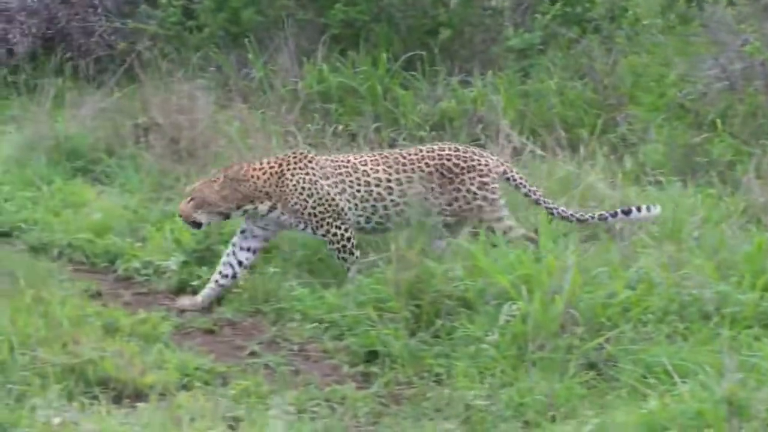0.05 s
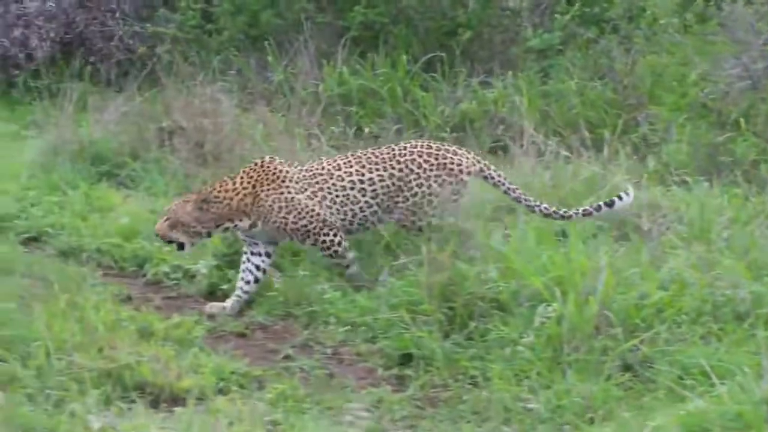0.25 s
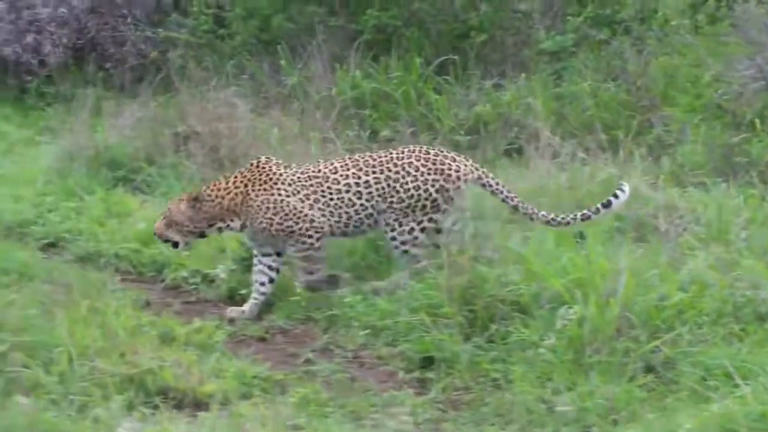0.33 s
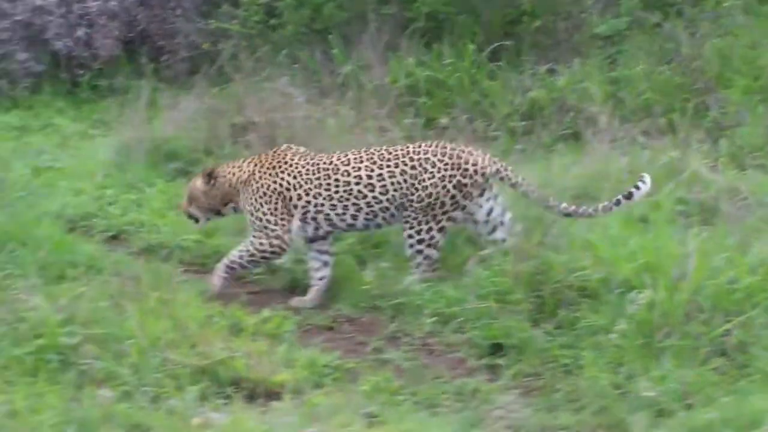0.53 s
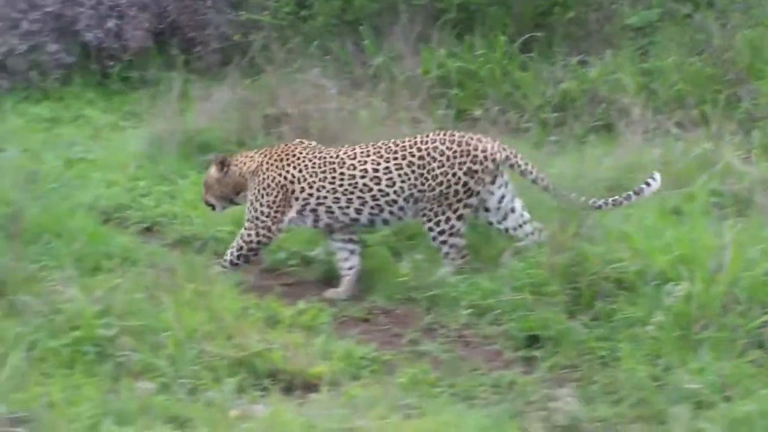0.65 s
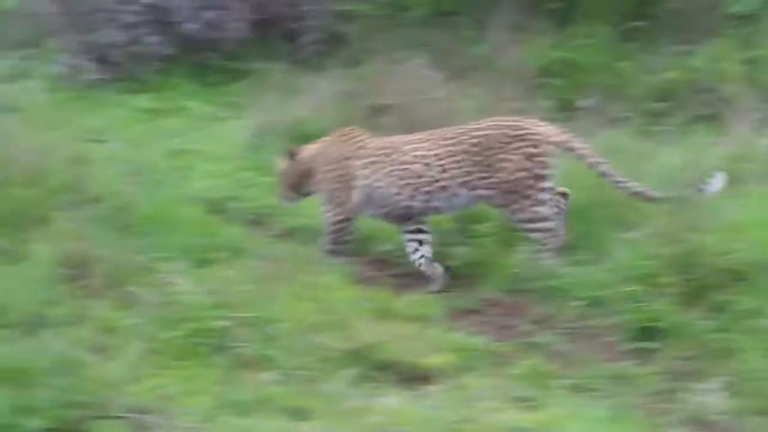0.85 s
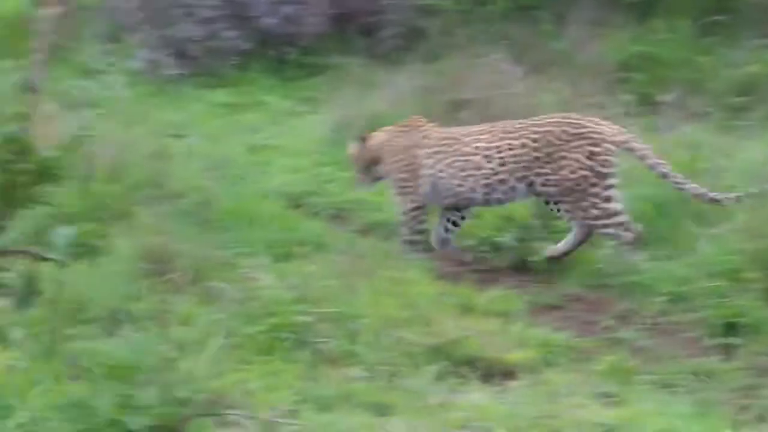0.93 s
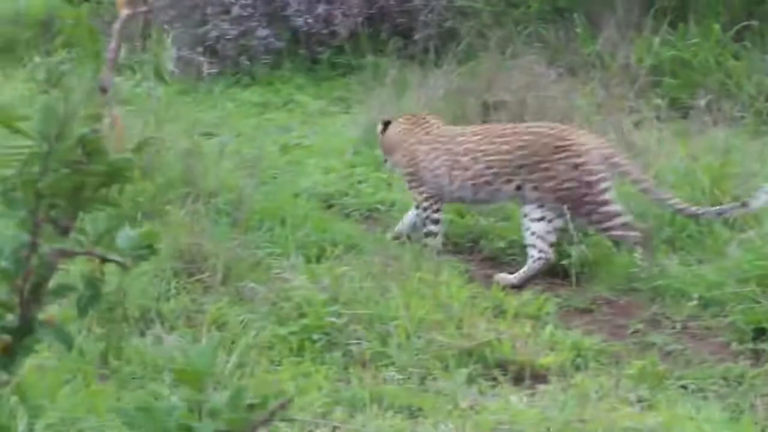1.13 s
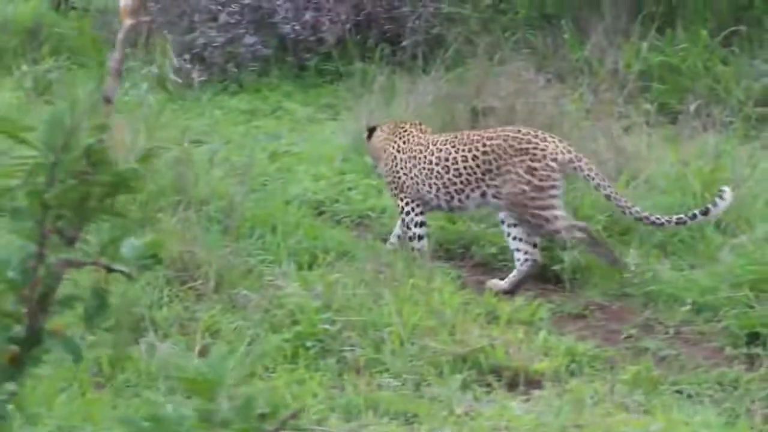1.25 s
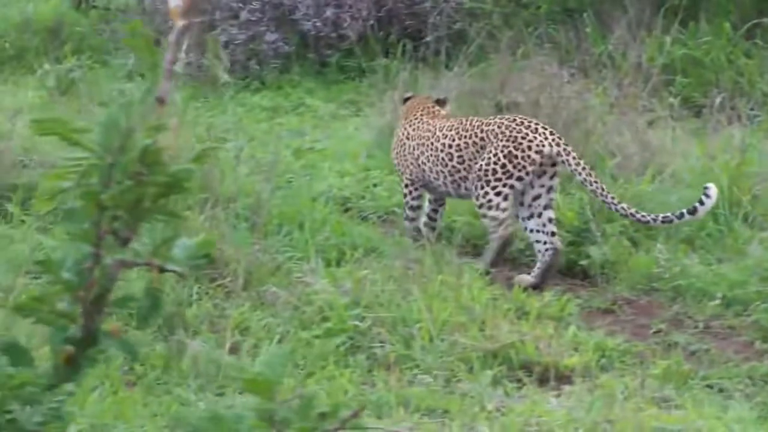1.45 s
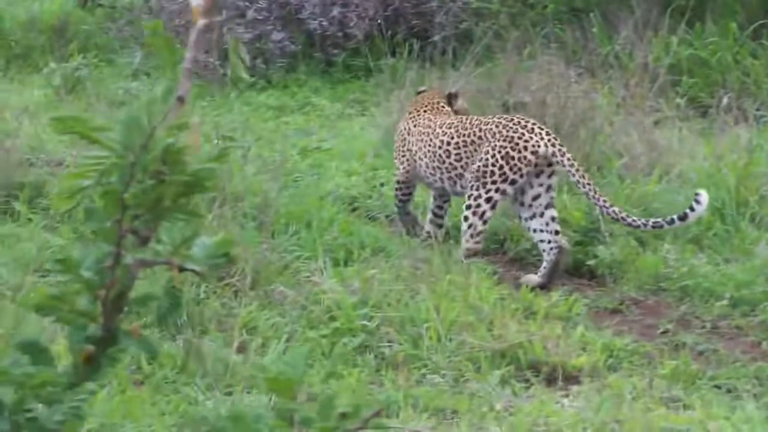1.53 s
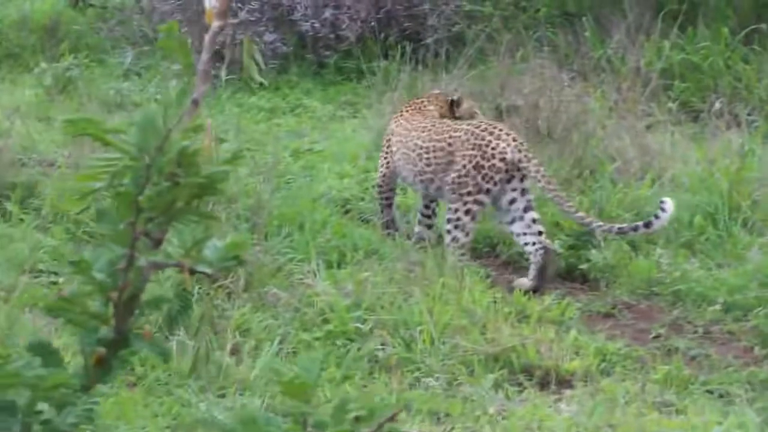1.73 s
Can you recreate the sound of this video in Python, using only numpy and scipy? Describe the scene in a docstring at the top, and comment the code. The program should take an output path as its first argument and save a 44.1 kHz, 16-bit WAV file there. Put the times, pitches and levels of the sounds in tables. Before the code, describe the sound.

A leopard's sawing call, close and centred: a rattling in-breath until about 0.1 s, a deep hoarse pulsing stroke from 0.2 to 0.55, a quieter uneven rattle around 0.65-0.9, then a second rasping stroke from 0.97 to 1.35. Dry stalks snap and crackle at 1.05-1.16. A fainter in-breath rattles from 1.4 to 1.8. Steady high insect hiss, soft leaf noise and low outdoor murmur continue throughout, with slight bush scatter.

```python
"""A rattling in-breath over an insect hiss comes first; then a leopard saws out two hoarse outward strokes.
Quieter in-breaths rattle between and after them, and dry stalks snap during the second stroke.
The slack vocal folds flap mostly 40-60 times a second; each flap rings the throat, mouth and lips
and lets out a puff of rasping air. Insects are noise in many narrow bands plus thin steady notes,
over a soft bed of leaf noise and low outdoor murmur."""
import sys
import numpy as np
from scipy import signal
from scipy.fft import rfft, irfft, next_fast_len
from scipy.io import wavfile
from scipy.ndimage import uniform_filter1d

SR = 44100
rng = np.random.default_rng(int(sys.argv[2]) if len(sys.argv) > 2 else 0)


def generate_wav(sig):
    """Save sig (samples, or channels by samples) to the path in sys.argv[1] as 16-bit PCM at SR."""
    pcm = np.round(np.clip(np.atleast_2d(sig).T, -1, 1) * 32767).astype(np.int16)
    wavfile.write(sys.argv[1], SR, pcm)


N = 79380  # 1.8 s


def amp(db):
    """Decibels to gain."""
    return 10 ** (np.asarray(db) / 20)


def unit(x):
    """Scale to rms 1."""
    return x / np.sqrt(np.mean(x ** 2) + 1e-20)


def at(rows, s):
    """Every column of a curve, interpolated at the times s."""
    knots, *columns = np.transpose(rows)
    return np.array([np.interp(s, knots, column) for column in columns])


def noise(spectrum, size=N):
    """Noise of rms 1 with the given (Hz, dB) colour."""
    hz, db = np.transpose(spectrum)
    bins = np.fft.rfftfreq(size, 1 / SR)
    gain = amp(np.interp(np.log(bins + 1), np.log(hz), db))
    return unit(irfft(rfft(rng.standard_normal(size)) * gain, size))


def fade(t60, attack):
    """A rounded rise and an exponential decay, 0.2 s long; t60 and attack in seconds."""
    t = np.arange(SR // 5) / SR
    return np.exp(-np.log(1000) * t / t60) * (1 - np.exp(-(t / attack) ** 2))


def ring(hz, db, t60, attack):
    """One resonance struck by a flap: a sine that builds up and dies away."""
    shape = fade(t60, attack)
    return amp(db) * shape * np.sin(2 * np.pi * hz * np.arange(len(shape)) / SR)


def burst(spectrum, db, t60, attack):
    """A dying puff of coloured noise."""
    shape = fade(t60, attack)
    return amp(db) * shape * noise(spectrum, size=len(shape))


def add(track, s, sound):
    """Mix a sound in at time s, cut off at the end of the track."""
    i = int(np.clip(round(s * SR), 0, N))
    track[i:i + len(sound)] += sound[:N - i]


def spread(make, alike):
    """A stereo pair from two draws of a sound, with the given likeness (1 = mono)."""
    turn = np.arccos(np.clip(alike, -1, 1)) / 2
    mid = np.cos(turn) * make()
    side = np.sin(turn) * make()
    return np.array([mid + side, mid - side])


def low_cut(x, hz, order):
    """A small mouth radiates little bass."""
    return signal.sosfilt(signal.butter(order, hz, 'high', fs=SR, output='sos'), x)


AIR_DB, AIR_ALIKE = -49, .99
LEAVES_DB, LEAVES_ALIKE = -49.5, 0.2
# Colour of the low outdoor murmur. Each row: frequency in Hz, density in dB per Hz.
AIR_COLOUR = [(25, -17.5), (60, -17.5), (110, -0.5), (190, 6.5), (350, 0), (600, -4), (1000, -18.5),
              (2000, -23.5), (4000, -66)]
# Colour of the leaves. Each row: frequency in Hz, density in dB per Hz.
LEAF_COLOUR = [(60, -50.5), (200, -0.5), (600, 0.5), (1000, -2), (2000, -5.5), (2550, -14), (3100, -26),
               (4500, -23.5), (7000, -58)]


def outdoors():
    """Steady coloured noise: a nearly mono low murmur and a wide bed of leaves."""
    air = amp(AIR_DB) * spread(lambda: noise(AIR_COLOUR), AIR_ALIKE)
    leaves = amp(LEAVES_DB) * spread(lambda: noise(LEAF_COLOUR), LEAVES_ALIKE)
    return air + leaves


INSECT_GRAIN_DB = 3.2  # rms unevenness between the narrow bands
INSECT_ALIKE, INSECT_PAN_DB = 0.51, 1  # pan: left up and right down by this much
# Colour of the hiss. Each row: frequency in Hz, density in dB per Hz.
INSECT_COLOUR = [(3060, -53.5), (5200, -31), (6280, -17.5), (6530, -10), (7040, -8), (7370, -2.5),
                 (7830, -1), (8920, -12), (9220, -15.5), (9980, -20), (10700, -29), (13900, -65.5),
                 (22000, -120)]
# Level of the hiss, dipping during the first stroke.
# Each row: time in seconds, level in dB before panning.
HISS_LEVEL = [(0, -47.5), (.2, -46), (.3, -50.5), (.5, -50), (.8, -48), (1.2, -47.5), (1.8, -46.5)]
# Thin steady notes in the chorus.
# Each row: frequency in Hz, amplitude in dB before the level curve and panning.
SHRILL_NOTES = [(7350, -62), (7568, -62), (8011, -59)]


def insects():
    """A distant chorus: a high hiss made of many narrow bands, with a few thin notes among it."""
    t = np.arange(N) / SR
    grain = unit(uniform_filter1d(rng.standard_normal(N // 2 + 1), size=20))
    bands = amp(INSECT_GRAIN_DB * grain)

    def hiss():
        return unit(irfft(rfft(noise(INSECT_COLOUR)) * bands, N))

    def note(hz, db):
        phase_drift = np.cumsum(rng.standard_normal(N)) * 0.022  # radians
        return amp(db) * np.sin(2 * np.pi * hz * t + phase_drift)

    chorus = spread(hiss, INSECT_ALIKE)
    notes = spread(lambda: sum(note(hz, db) for hz, db in SHRILL_NOTES), INSECT_ALIKE)
    level_db = at(HISS_LEVEL, t)[0]
    levelled = amp(level_db) * chorus + amp(level_db - level_db.mean()) * notes
    return levelled * amp([[INSECT_PAN_DB], [-INSECT_PAN_DB]])


BUSH_DB, BUSH_T60, BUSH_ALIKE = -8, 0.12, 0.23  # t60 in seconds
# Colour of the thicket's scatter. Each row: frequency in Hz, level in dB.
BUSH_COLOUR = [(150, -19), (400, -15), (900, -1.5), (2000, -3), (3000, 10.5), (9000, 1.5)]


def thicket(x):
    """A short scatter from the bushes, mostly above the bass: a decaying noise tail."""
    tail = spread(lambda: burst(BUSH_COLOUR, 0, BUSH_T60, attack=0.0036), BUSH_ALIKE)
    tail = tail / np.linalg.norm(tail[0])
    return signal.fftconvolve(x[None], tail, axes=1)[:, :N]


SNAP_T60, KNOCK_T60 = 0.016, 0.051  # s
CRACKLE_FROM_S, CRACKLE_TO_S = 1.045, 1.16
CRACKLE_DB, CRACKLE_SCATTER_DB = -40.5, 2
# Breaking stalks. Each row: start in seconds, snap level in dB, woody knock level in dB.
STALK_SNAPS = [(1.049, -29, -24.5), (1.083, -33.5, -23), (1.0989, -27, -35.5), (1.1021, -20.5, -27.5),
               (1.1459, -28, -21.5), (1.154, -36, -32.5)]
# Colour of the snap. Each row: frequency in Hz, density in dB per Hz.
SNAP_COLOUR = [(1000, -31), (3000, -11.5), (5000, -10), (7000, 12.5), (9000, -2.5), (12000, -24),
               (15500, -36)]
# Colour of the woody knock. Each row: frequency in Hz, density in dB per Hz.
KNOCK_COLOUR = [(300, -14), (700, -7.5), (1300, 16), (2200, 6.5), (3200, -37), (6000, -39)]


def stalks():
    """Dry stalks break with a bright snap and a woody knock; small fibres give way in between."""
    out = np.zeros(N)
    for s, snap_db, knock_db in STALK_SNAPS:
        snap = burst(SNAP_COLOUR, snap_db, SNAP_T60, attack=0.0004)
        knock = burst(KNOCK_COLOUR, knock_db, KNOCK_T60, attack=0.00083)
        add(out, s, snap + knock)
    for s in rng.uniform(CRACKLE_FROM_S, CRACKLE_TO_S, size=16):
        fibre_db = CRACKLE_DB + CRACKLE_SCATTER_DB * rng.normal()
        add(out, s, burst(SNAP_COLOUR, fibre_db, SNAP_T60, attack=.0005))
    return out


UPPER_SCATTER_DB, UPPER_DETUNE, UPPER_ATTACK_S = 3.5, 0.0085, 0.00174  # detune as a fraction of pitch
PUFF_DB, PUFF_ATTACK_S, PUFF_T60 = -2.5, 0.0015, .065  # level relative to the rasp, t60 in seconds
# Colour of the air puffs. Each row: frequency in Hz, density in dB per Hz.
PUFF_COLOUR = [(40, -43), (100, -19.5), (200, 12.5), (450, 15.5), (800, -24), (1000, 0.5), (1350, 1.5),
               (2000, 7.5), (2450, -2.5), (3000, -29.5), (4800, -34.5), (6000, -9.5), (8000, -16.5),
               (11000, -36), (14000, -66.5)]


def rasp(modes, db):
    """The hoarse part of one flap: unsteady upper resonances and a puff of air."""
    out = burst(PUFF_COLOUR, db + PUFF_DB, PUFF_T60, PUFF_ATTACK_S)
    for hz, level_db, t60 in modes:
        mode_hz = hz * (1 + UPPER_DETUNE * rng.normal())
        mode_db = db + level_db + UPPER_SCATTER_DB * rng.normal()
        out += ring(mode_hz, mode_db, t60, UPPER_ATTACK_S)
    return out


FLUTTER_PER_S, FLUTTER_SCATTER = 63, 0.18  # scatter as a fraction of a beat
INWARD_ATTACK_S, BREATH_CUT_HZ = 0.0015, 146
# Individually timed flaps of the in-breath, strong and weak.
# Each row: start in seconds, throat dB, rasp dB, before the low cut.
TIMED_FLAPS = [(0.029, -18, -30.5), (0.049, -21, -27), (.08, -17.5, -31.5), (.104, -24.5, -34),
               (0.627, -29, -50), (0.68, -23, -36), (.726, -32, -70), (0.773, -41, -40), (0.807, -29, -40),
               (0.857, -22, -58), (1.419, -32, -56), (1.494, -28, -46), (1.546, -29, -59),
               (1.593, -48, -70), (1.653, -32.5, -48), (1.68, -22, -55), (1.712, -28.5, -72),
               (1.788, -32, -49)]
# Level of the random flutter. Each row: time in seconds, throat dB, rasp dB, before the low cut.
FLUTTER_LEVEL = [(0, -23, -37.5), (.09, -29.5, -48.5), (.135, -44.5, -49), (.6, -62.5, -65.5),
                 (.7, -30.5, -41.5), (.79, -21.5, -51), (.87, -24, -36.5), (.935, -42, -59),
                 (1.4, -45.5, -70), (1.48, -36.5, -50), (1.64, -27, -70), (1.73, -31, -72),
                 (1.755, -55, -69)]
# Resonances with the mouth drawing in.
# Each row: centre frequency in Hz, mean level in dB relative to the throat, t60 in seconds.
INWARD_MODES = [(199.6, 1.5, 0.049), (339, -1.5, .05), (470, -11, 0.044)]
# Upper resonances, drawing in.
# Each row: centre frequency in Hz, mean level in dB relative to the rasp, t60 in seconds.
INWARD_UPPER_MODES = [(634, -1.5, 0.11), (1685, -7, 0.082), (2137, -7, 0.071)]


def in_breaths():
    """Air drawn back in rattles the folds unevenly, with some timed flaps among the random flutter."""
    out = np.zeros(N)
    beats = np.arange(N / SR * FLUTTER_PER_S)
    times = (beats + FLUTTER_SCATTER * rng.standard_normal(len(beats))) / FLUTTER_PER_S
    flutter = [(s, *at(FLUTTER_LEVEL, s)) for s in times]
    for s, throat_db, rasp_db in TIMED_FLAPS + flutter:
        flap = rasp(INWARD_UPPER_MODES, rasp_db)
        for hz, db, t60 in INWARD_MODES:
            mode_hz = hz * (1 + 0.052 * rng.normal())
            mode_db = throat_db + db + 0.9 * rng.normal()
            flap += ring(mode_hz, mode_db, t60, INWARD_ATTACK_S)
        add(out, s, flap)
    return low_cut(out, BREATH_CUT_HZ, order=4)


THROAT_T60, MOUTH_T60, LIP_T60, NOSE_T60 = 0.13, 0.071, 0.066, 0.089  # s
THROAT_ATTACK_S, MOUTH_ATTACK_S = 0.0025, 0.0024
REST_HZ, LIP_FOLLOWS = 246, .35  # lips and nose follow throat pitch / rest pitch to this power
LIP_HZ, NOSE_HZ, NOSE_DB = 758, 317.7, -18  # pitches at rest; nose level relative to the throat
FLAP_JITTER_S, FLAP_SCATTER_DB = .00004, .5
STROKE_CUT_HZ = 224.4
# Speed of the folds, one list per outward stroke. Each row: time in seconds, flaps per second.
STROKE_FLAP_RATES = [
    [(.1815, 51), (.21, 45.5), (.25, 51.5), (.29, 55.8), (.33, 58.9), (.37, 60.1), (.42, 58.3), (.47, 53),
     (.51, 47), (.55, 39)],
    [(.9645, 48.6), (1, 41), (1.04, 47.6), (1.09, 50), (1.13, 54.9), (1.18, 54.7), (1.22, 55.1),
     (1.26, 52.6), (1.3, 44), (1.34, 27)],
]
# Resonances, one list per outward stroke, with levels before flap scatter and the low cut.
# Each row: time in seconds, throat Hz, throat dB, mouth Hz, mouth dB, lip dB, rasp dB.
STROKE_RESONANCES = [
    [(.183, 224, -17, 560, -26.5, -53, -38.5), (.203, 222, -16, 591, -12, -34, -27.5),
     (.225, 242.7, -4, 674, -9.5, -26.5, -20.5), (.255, 274.4, -3.5, 641, -13.5, -26, -24),
     (.298, 262.6, -14.5, 646, -15, -41.5, -35), (.32, 268, -4, 688, -9, -46, -29.5),
     (.4, 244.6, -7.5, 619, -8, -27.5, -32.5), (.455, 203.3, -11, 550, -17.5, -26, -32.5),
     (.513, 183.6, -12.5, 524, -22.5, -27, -31.5), (.54, 185, -37.5, 490, -43, -49, -36.5)],
    [(.966, 191, -14, 507, -63, -27.5, -35), (1.005, 209, -8.5, 563, -30, -19, -24.5),
     (1.04, 241.7, -6.5, 590, -23, -18, -26), (1.09, 242.3, -8.5, 596, -27, -23, -24),
     (1.125, 255.4, -8, 631, -17, -29.5, -30), (1.19, 238, -5.5, 563, -18, -23, -29.5),
     (1.243, 210, -8.5, 524, -26.5, -16.5, -32.5), (1.3, 172.2, -11.5, 502, -26, -40, -33.5),
     (1.33, 180, -56, 455, -53, -37, -40)],
]
# Upper resonances, blowing out.
# Each row: centre frequency in Hz, mean level in dB relative to the rasp, t60 in seconds.
OUTWARD_UPPER_MODES = [(1204, -15, 0.067), (1432, -4.5, 0.064), (1680, -13.5, 0.072), (1947, -6.5, 0.062),
                       (2226, -11, 0.071), (2481, -17, 0.057)]


def strokes():
    """Outward strokes: the flaps speed up and the resonances rise with effort, then sink again."""
    out = np.zeros(N)
    for rates, rows in zip(STROKE_FLAP_RATES, STROKE_RESONANCES):
        t = np.arange(rates[0][0], rates[-1][0], 1 / SR)
        cycles = np.cumsum(at(rates, t)[0]) / SR
        flap_times = np.interp(np.arange(cycles[-1]), cycles, t)  # one flap per whole cycle
        for s in flap_times:
            throat_hz, throat_db, mouth_hz, mouth_db, lip_db, rasp_db = at(rows, s)
            stretch = (throat_hz / REST_HZ) ** LIP_FOLLOWS
            throat = ring(throat_hz, throat_db, THROAT_T60, THROAT_ATTACK_S)
            nose = ring(NOSE_HZ * stretch, throat_db + NOSE_DB, NOSE_T60, THROAT_ATTACK_S)
            mouth = ring(mouth_hz, mouth_db, MOUTH_T60, MOUTH_ATTACK_S)
            lips = ring(LIP_HZ * stretch, lip_db, LIP_T60, MOUTH_ATTACK_S)
            flap = throat + nose + mouth + lips + rasp(OUTWARD_UPPER_MODES, rasp_db)
            gain = amp(FLAP_SCATTER_DB * rng.normal())
            add(out, s + FLAP_JITTER_S * rng.normal(), gain * flap)
    return low_cut(out, STROKE_CUT_HZ, order=6)


def scene():
    """The cat and stalks in the middle, with insects, leaves and outdoor air all round."""
    near = stalks() + in_breaths() + strokes()
    return outdoors() + insects() + amp(BUSH_DB) * thicket(near) + near


TOP_HZ = 15300


def record(dry):
    """A steep band limit: nothing at or above TOP_HZ passes."""
    m = next_fast_len(N + SR // 2)  # padded so the filter does not wrap round
    passband = np.fft.rfftfreq(m, 1 / SR) < TOP_HZ
    return irfft(rfft(dry, m) * passband, m)[:, :N]


dry = scene()
out = record(dry)
generate_wav(out)
```